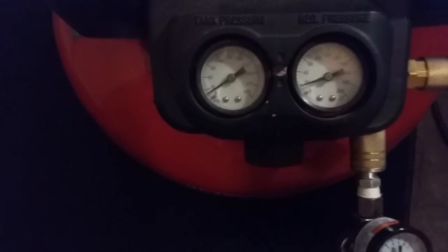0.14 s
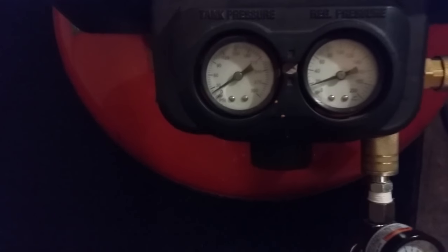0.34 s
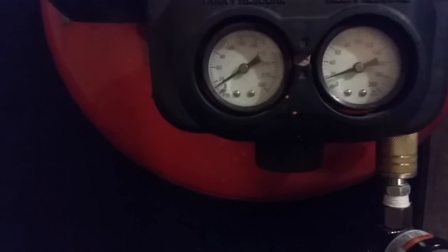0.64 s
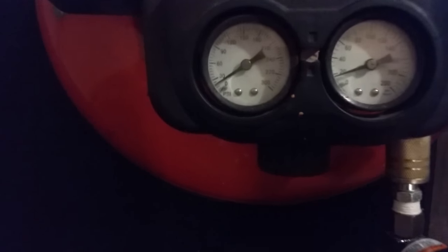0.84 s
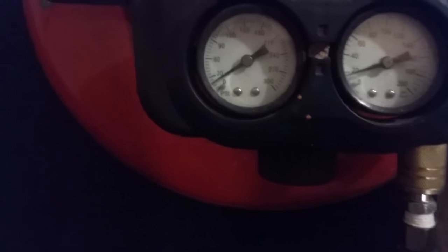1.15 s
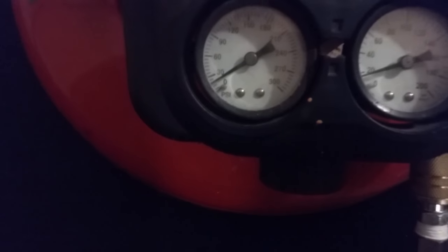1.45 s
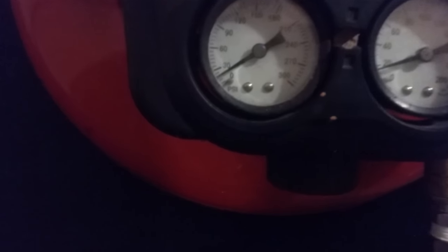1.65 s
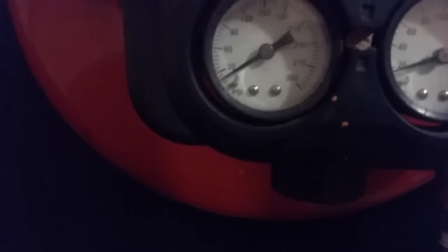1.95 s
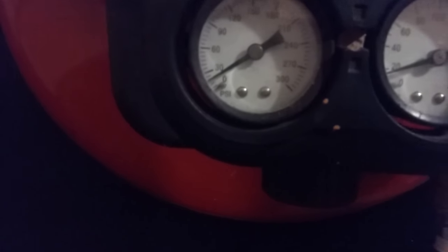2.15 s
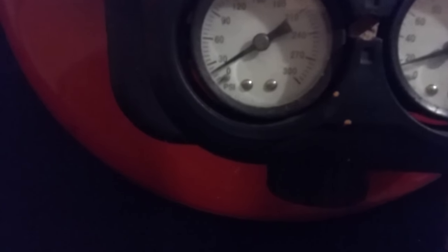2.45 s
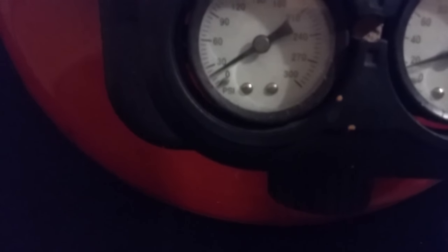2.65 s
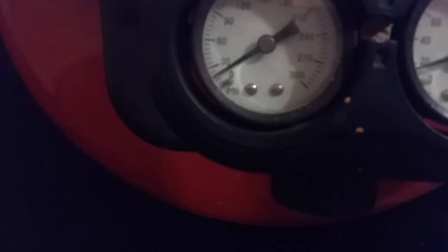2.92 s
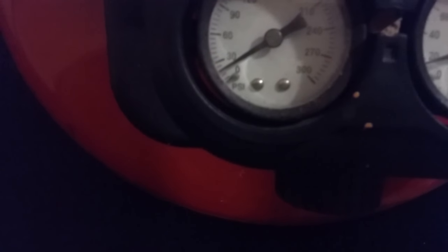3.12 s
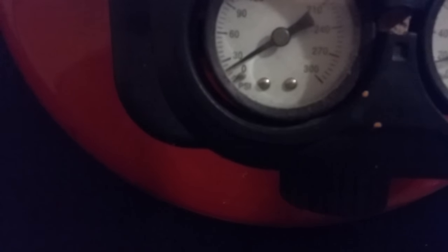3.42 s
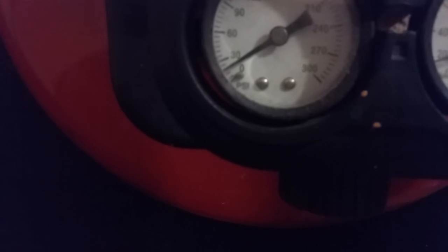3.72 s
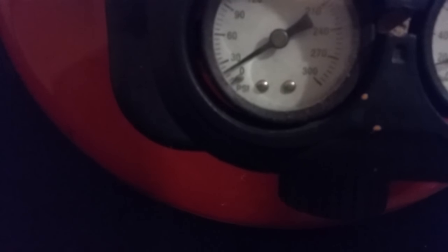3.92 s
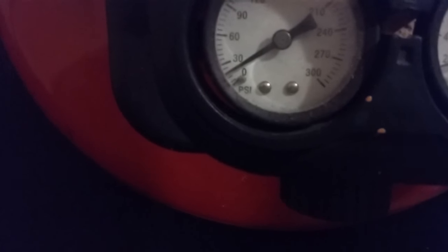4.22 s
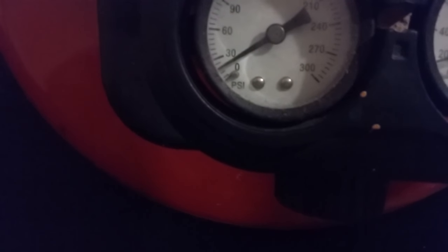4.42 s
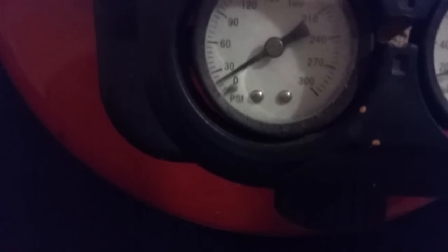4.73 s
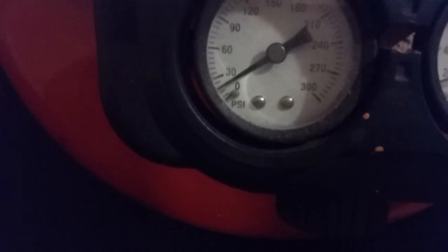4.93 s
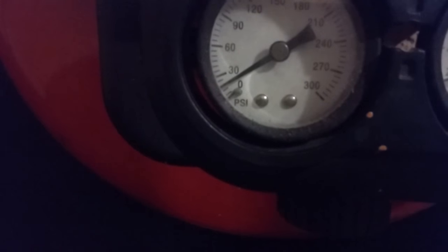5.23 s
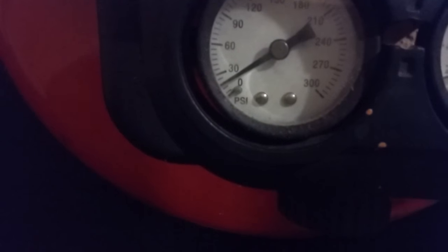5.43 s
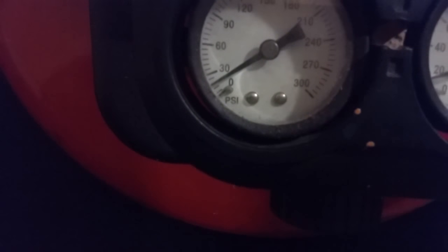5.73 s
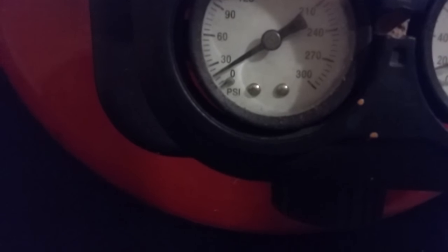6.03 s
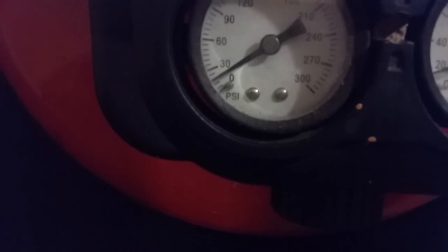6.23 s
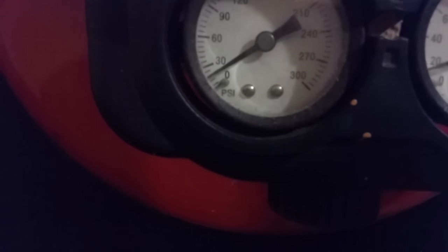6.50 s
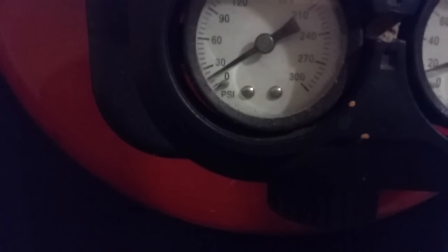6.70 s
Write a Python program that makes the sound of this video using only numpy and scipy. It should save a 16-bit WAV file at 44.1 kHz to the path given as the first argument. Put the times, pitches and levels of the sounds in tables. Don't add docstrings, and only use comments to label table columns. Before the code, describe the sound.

Close up on a workbench, rapid regular bursts of escaping air go tss-tss-tss, around six each second, nearly constant in pace throughout. Every puff starts with a thin double chirp and ends in a faint leak, with a soft double thud beneath. Knocking and rumble swell and ease, metallic chatter comes in spells, and the small microphone gives thin deep bass and a dry, tight room.

```python
import sys
import numpy as np
from scipy import signal
from scipy.io import wavfile

SR = 44100
rng = np.random.default_rng(int(sys.argv[2]) if len(sys.argv) > 2 else 0)


def how_loud(loudness_db):
    steps = np.asarray(loudness_db, float) / 20
    return 10 ** steps


def digitize_waveform(pressure):
    field = np.atleast_2d(pressure).T
    bounded = np.clip(field, -1, 1)
    quanta = np.round(bounded * 32767).astype(np.int16)
    wavfile.write(sys.argv[1], SR, quanta)


N = 302692

# f/Hz, level/dB under a turn's first knock, level/dB under its second, t60/s
FRAME = [(68.2, -6.5, -5.5, 0.45), (120.6, 2, 6, 0.044), (192.2, -6.5, -6.5, 0.17), (230, 0, -20, 0.048),
         (273.7, -1.5, -3, 0.17), (332, -10, -15.5, 0.098), (363.2, -11, -6, 0.16),
         (434, -17, -19.5, 0.063), (791, -8, -18.5, 0.05)]
TAIL_S = 0.086
USUAL_JET_DB, USUAL_SHAKE_DB = -33, -33


def rms_one(x):
    return x / np.sqrt(np.mean(x ** 2) + 1e-20)


def read(curve, s):
    return np.interp(s, *np.transpose(curve))


def in_time(s, values):
    return np.interp(np.arange(N) / SR, s, values)


def at_hz(points, hz):
    f, level_db = np.transpose(points)
    return np.interp(np.log(hz), np.log(f), level_db)


def drift(rate):
    r = np.exp(-40 * np.pi * rate / SR)
    slow = signal.lfilter([1], [1, -2 * r, r * r], rng.standard_normal(N // 20 + 2002))[2000:]
    return np.interp(np.arange(N) / 20, np.arange(len(slow)), rms_one(slow))


def resonance(x, hz, width):
    r = np.exp(-np.pi * width / SR)
    feedback = [1, -2 * r * np.cos(2 * np.pi * hz / SR), r * r]
    return signal.lfilter(np.array([1, 0, -1]) * (1 - r * r) / 2, feedback, x)


def ring(clicks, hz, t60):
    r = how_loud(-60 / (t60 * SR))
    w = 2 * np.pi * hz / SR
    return signal.lfilter([0, np.sin(w)], [1, -2 * r * np.cos(w), r * r], clicks + 1e-18)


def bands(spectrum, count):
    edges = np.geomspace(spectrum[0][0], spectrum[-1][0], count + 1)
    centres = np.sqrt(edges[1:] * edges[:-1])
    white = rng.standard_normal((2, N))
    out = []
    for k in range(count):
        sos = signal.butter(2, edges[k:k + 2], "band", fs=SR, output="sos")
        out.append(how_loud(at_hz(spectrum, centres[k])) * signal.sosfilt(sos, white[k % 2]))
    out = np.array(out)
    return out / np.sqrt(np.mean(out.sum(0) ** 2)), centres


def openings():
    # turn number, port opens t/s
    turns = [(0, -.047), (4, .564), (10, 1.494), (11, 1.652), (13, 1.96), (22, 3.357), (25, 3.828),
             (27, 4.146), (29, 4.459), (31, 4.778), (34, 5.25), (38, 5.888), (41, 6.374), (44, 6.854)]
    return read(turns, np.arange(turns[-1][0] + 1))


def per_stroke(shape, top_db):
    s, db = np.transpose(shape)
    return in_time((openings()[:, None] + s).ravel(), (top_db[:, None] + db).ravel())


def shaking(s):
    # t/s, level/dB
    shake_curve = [(0, -44.5), (.3, -35), (.9, -30), (1.5, -33), (1.75, -46.5), (2.15, -30.5), (2.7, -30.5),
                   (3.14, -42.5), (3.6, -31.5), (4.1, -29), (4.4, -42), (4.8, -45), (5.17, -32),
                   (5.55, -29), (6.13, -45), (6.45, -35), (6.86, -31)]
    return read(shake_curve, s) - USUAL_SHAKE_DB


def facing(s):
    # t/s, level/dB
    facing_curve = [(.1, -36), (.45, -33), (1.1, -33), (1.6, -36.5), (2.2, -39), (3.8, -38.5), (4.6, -40.5),
                    (5.5, -40.5), (6.3, -43), (6.86, -40)]
    return read(facing_curve, s)


def strokes():
    # t/s, level/dB
    pressure = [(-.05, -43), (.1, -34), (.26, -32.5), (.5, -33.5), (.75, -32.5), (1.35, -33), (1.75, -35.5),
                (2.1, -34), (2.8, -32), (3.36, -35), (3.7, -31.5), (4.15, -32.5), (4.5, -33), (4.8, -35.5),
                (5.55, -31), (6.05, -32.5), (6.22, -35.5), (6.86, -31)]
    # t/s, leak level/dB
    seating = [(.105, 0.5), (.258, -2.1), (.718, -8), (1.338, -6), (1.494, -14), (1.652, -2), (1.807, 2),
               (2.27, -3.5), (2.581, 3), (2.736, -1), (3.046, -1), (3.357, 2.5), (3.672, 3), (3.987, -4),
               (4.147, -4), (4.303, 4), (4.458, 5.5), (4.619, -8), (4.778, -4), (5.409, 2.5), (5.568, -3),
               (5.729, 3.5), (6.051, -10), (6.374, -2), (6.694, 2.5)]
    s = openings()
    jet = read(pressure, s) - USUAL_JET_DB
    shake = shaking(s + TAIL_S)
    leak_db = -57.5 + 0.34 * shake
    for when, change_db in seating:
        leak_db[np.argmin(abs(s - when))] += change_db
    whistle_db = facing(s) + 0.5 * jet
    tail_db = -47.5 + 0.48 * jet + 0.17 * shake - 0.32 * s
    throat_db = -49.5 + 0.73 * jet
    return s, USUAL_JET_DB + jet, whistle_db, tail_db, leak_db, throat_db


def flow():
    # t/s after opening, level/dB under the jet's top
    rise = [
        (-.010, -21.5),
        (-.003, -17),
        (.003, -10.5),
        (.011, -5),
        (.021, 0),
        (.036, -1.5),
    ]
    leak_start_s, leak_end_s = 0.12, 0.13
    s, jet_db, _, tail_db, leak_db, _ = strokes()
    rise_s, rise_db = np.transpose(rise)
    times = s[:, None] + np.r_[rise_s, TAIL_S, leak_start_s, leak_end_s]
    levels = np.c_[jet_db[:, None] + rise_db, tail_db, leak_db, leak_db]
    return in_time(times.ravel(), levels.ravel())


def whistle(air):
    # f/Hz, width/Hz, level/dB
    port = [(5720, 200, -4), (5900, 240, 0), (6150, 260, -1)]
    # t/s after opening, level/dB
    whistle_shape = [
        (-.016, -27),
        (-.0025, -19),
        (.002, 1),
        (.006, -1),
        (.009, -6),
        (.014, 1),
        (.024, -1),
        (.05, -9),
        (.12, -28),
    ]
    whistle_db = strokes()[2]
    tone = rms_one(sum(how_loud(db) * resonance(air, hz, width) for hz, width, db in port))
    return how_loud(per_stroke(whistle_shape, whistle_db) - 1.0 + 0.5 * drift(90)) * tone


def throat_noise(gate_db):
    # f/Hz, level/dB per Hz
    throat = [(500, -4.5), (1000, -5.5), (1500, -1), (2200, 1), (3200, -3.5), (4500, -2)]
    # t/s after opening, level/dB
    throat_shape = [
        (-.012, -14),
        (0, -3),
        (.01, 7),
        (.035, 5),
        (.08, -5),
        (.125, -18.5),
    ]
    throat_db = strokes()[5]
    puff = sum(band * how_loud(1.07 * drift(28)) for band in bands(throat, count=7)[0])
    return how_loud(per_stroke(throat_shape, throat_db) - 1.0 + 2.1 * gate_db) * puff


def jet_hiss(flow_db):
    # f/Hz, level/dB per Hz
    jet_colour = [(2500, -28), (4000, -12.5), (5200, -3), (6300, -7.5), (7500, 15), (8400, -11.5),
                  (9400, 0), (11500, -2.5), (13500, -4), (15500, -5.5), (18500, -17)]
    # f/Hz, dB per dB of flow
    jet_depth = [(3000, 0.4), (7000, 1.064), (10000, 1.07), (15000, 1.26)]
    # t/s after opening, share/0-1
    slit_shape = [
        (-.002, 0),
        (.005, 1),
        (.022, 0),
    ]
    # f/Hz, level/dB
    slit_colour = [(4000, -1), (7000, 2.5), (8500, -9), (10000, 4.5), (15000, 7.5)]
    s, jet_db = strokes()[:2]
    top_db = in_time(s + .02, jet_db)
    eddies = drift(110)
    slit = per_stroke(slit_shape, 0 * s)
    jet = np.zeros(N)
    for band, hz in zip(*bands(jet_colour, count=13)):
        level_db = top_db + at_hz(jet_depth, hz) * (flow_db - top_db) + at_hz(slit_colour, hz) * slit
        flutter_db = 0.47 * eddies + 0.8 * drift(34) + 0.82 * drift(2.7)
        jet += band * how_loud(level_db + flutter_db)
    return how_loud(1.0) * jet


def nozzle_tones(flow_db, air):
    # f/Hz, width/Hz, level/dB
    nozzle = [(5300, 50, -17), (5695, 70, -14), (6200, 45, -13), (6500, 50, -15), (6923, 60, -13),
              (7220, 55, -12), (7472, 45, -10), (7630, 45, -10), (8030, 30, -12), (8250, 40, -15),
              (8432, 30, -13), (8790, 45, -16), (11000, 90, -15), (11327, 35, -14), (12700, 40, -17)]
    aside_db, shadow = -39.5, 0.25
    tones = sum(how_loud(db - 1.5 + 3.5 * drift(3)) * rms_one(resonance(air, hz, width))
                for hz, width, db in nozzle)
    shadow_db = shadow * (facing(np.arange(N) / SR) - aside_db)
    return how_loud(flow_db - 3.5 - shadow_db) * tones


def exhaust(flow_db, gate_db):
    air = rng.standard_normal(N)
    return (whistle(air) + throat_noise(gate_db)
            + jet_hiss(flow_db) + nozzle_tones(flow_db, air))


def background():
    # middle t/s, level/dB over calm, half length/s
    chatter_spells = [(.08, 3, 0.11), (0.556, 9, 0.2), (.74, 10.5, 0.13), (1.2, 7, 0.28), (1.45, 8.5, 0.23),
                      (2.251, 7, 0.27), (2.62, 7.5, 0.36), (2.993, 3, 0.16), (3.48, 9, 0.11),
                      (3.87, 12.5, 0.24), (4.534, 8, 0.24), (5.3, 3.5, 0.18), (5.483, 8.5, 0.18),
                      (5.906, 10.5, 0.17), (6.326, 5.5, .12), (6.665, 6.5, 0.11), (6.86, 14, .12)]
    # t/s after opening, level/dB
    load_shape = [
        (.0, -1.5),
        (.045, -1.5),
        (.07, 1.5),
        (.11, 1),
    ]
    t = np.arange(N) / SR
    shake = shaking(t)
    chatter = sum(db * np.maximum(1 - abs(t - s) / half, 0) for s, db, half in chatter_spells)
    rumble_db = -48.5 + 0.26 * shake + per_stroke(load_shape, 0 * openings())
    linkage_db = -56 + 0.28 * chatter + 0.34 * shake - 0.35 * t
    return rumble_db, linkage_db, -61.5 + chatter


def rumble(level_db):
    # f/Hz, level/dB per Hz
    bench = [(30, -19), (45, -8), (65, -2), (120, -4), (200, -10), (380, -14), (600, -18), (1100, -23)]
    low, _ = bands(bench, count=10)
    shared, white = drift(24), rng.standard_normal(N)
    hum = rms_one(sum(how_loud(db) * rms_one(ring(white, hz, t60)) for hz, _, db, t60 in FRAME))
    lumps = sum(band * how_loud(1.6 * drift(14)) for band in low)
    return how_loud(level_db + 1.0 * shared) * (lumps + how_loud(-5.5) * hum)


def rattle(modes, level_db, per_s):
    sizes = how_loud(2.3 * np.minimum(rng.exponential(1, N), 5)) * rng.choice([-1, 1], N)
    hits = sizes * (rng.random(N) < per_s * how_loud(3.0 * drift(15)) / SR)
    dealt = rng.integers(0, len(modes), N)
    rings = sum(how_loud(db) * ring(hits * (dealt == k), hz, t60) for k, (hz, t60, db) in enumerate(modes))
    return how_loud(level_db + 3.0) * rms_one(rings)


def linkage_rattle(level_db):
    # f/Hz, t60/s, level/dB
    linkage = [(1372, 0.03, -5), (1453, 0.034, 1.5), (1561, 0.037, -3.5), (817, 0.018, -10.5),
               (1155, 0.044, -8.5)]
    return rattle(linkage, level_db, per_s=1100)


def crosshead_chatter(level_db):
    # f/Hz, t60/s, level/dB
    crosshead = [(1774, 0.028, -6), (1954, 0.018, -1), (2124, 0.02, -3.5), (2480, 0.0072, -2)]
    return rattle(crosshead, level_db, per_s=800)


def knock_times():
    lags_s, scatter_s, scatter_db = (.063, .085), 0.004055, 1.5
    opened = openings()[:-1, None]
    chance = rng.standard_normal((len(opened), 4))
    s = opened + lags_s + scatter_s * chance[:, :2]
    shake = shaking(s)
    first_db = -0.6 + 0.81 * shake[:, 0] - 0.66 * s[:, 0]
    second_db = -0.3 + shake[:, 1]
    peak_db = USUAL_SHAKE_DB + np.c_[first_db, second_db] + scatter_db * chance[:, 2:]
    return s.ravel(), peak_db.ravel()


def knocks():
    # t/s, signed strength
    shudder = [
        (-.007, -0.83),
        (0, 0.87),
        (0.0099, 0.38),
        (0.015, -0.36),
    ]
    s, peak_db = knock_times()
    at, out = (s * SR).astype(int), np.zeros(N)
    spread = rng.standard_normal((len(s), len(FRAME)))
    second = np.arange(len(s)) % 2
    for k, (hz, first_db, second_db, t60) in enumerate(FRAME):
        blows = np.zeros(N)
        blows[at] = how_loud(peak_db + np.where(second, second_db, first_db) - 9.5 + 1.04 * spread[:, k])
        pushes = sum(strength * np.roll(blows, round(lag * SR)) for lag, strength in shudder)
        out += ring(pushes, hz, t60)
    return out


def pings():
    # t/s, peak level/dB, f/Hz
    ping_events = [(0.086, -28, 1890), (0.109, -30, 1840), (0.121, -27, 1920), (0.169, -29, 1770),
                   (0.492, -27, 1870), (0.554, -28, 1940), (0.67, -26, 1980), (0.701, -26, 1930),
                   (0.788, -23, 1900), (1.17, -32, 2085), (1.819, -29, 1680), (2.726, -25, 2142),
                   (2.899, -28, 2470), (3.491, -24.5, 2020), (3.685, -31, 2380), (3.733, -28, 1410),
                   (3.968, -27, 1900), (4.429, -26, 2070), (4.545, -27, 2110), (4.577, -25, 2020),
                   (5.39, -33, 2090), (5.543, -24.5, 2100), (5.885, -25, 2120), (6.379, -27, 1981),
                   (6.674, -33, 1810), (6.684, -26, 2070), (6.804, -26, 2200), (6.839, -28, 2050)]
    out, t = np.zeros(N + SR // 10), np.arange(SR // 40) / SR
    swell = t / 0.0024 * np.exp(1 - t / .0014)
    for s, peak_db, hz in ping_events:
        pair = np.sin(2 * np.pi * hz * t) + 0.35 * np.sin(2 * np.pi * 0.874 * hz * t)
        out[round(s * SR):][:len(t)] += how_loud(peak_db - 5.5) * swell * pair
    return out[:N]


def workshop(x):
    t60_s, room_db = 0.16, -9.5
    t = np.arange(SR // 5) / SR
    tail = rng.standard_normal(len(t)) * how_loud(-60 * t / t60_s) * (t > .002)
    return x + how_loud(room_db) * signal.fftconvolve(x, tail / np.sqrt(np.sum(tail ** 2)))[:N]


def scene():
    quiet_db, sink = -54.5, 0.62
    rumble_db, linkage_db, crosshead_db = background()
    flow_db = flow()
    gate_db = sink * np.minimum(flow_db - quiet_db, 0)
    air = exhaust(flow_db, gate_db)
    loose = linkage_rattle(linkage_db) + crosshead_chatter(crosshead_db)
    frame = how_loud(gate_db) * (rumble(rumble_db) + knocks())
    engine = air + how_loud(gate_db) * loose + pings()
    return (how_loud(-1.21) * workshop(engine) + frame)[None]


def low_pass(x):
    return signal.sosfilt(signal.butter(12, 16890, fs=SR, output="sos"), x)


def record(dry):
    x = signal.sosfilt(signal.butter(8, 48, "high", fs=SR, output="sos"), dry)
    x = signal.sosfilt(signal.ellip(14, .3, 80, 15800, fs=SR, output="sos"), x)
    return low_pass(x - .0004)


dry = scene()
out = record(dry)
digitize_waveform(out)
```